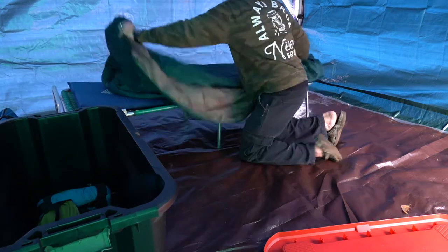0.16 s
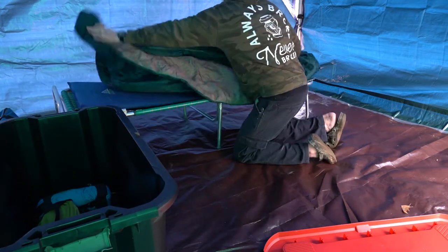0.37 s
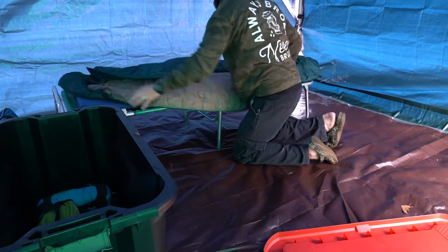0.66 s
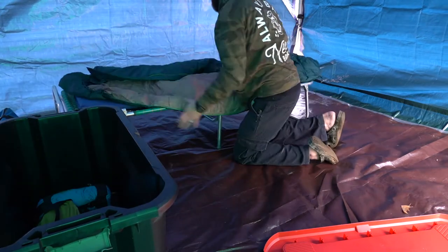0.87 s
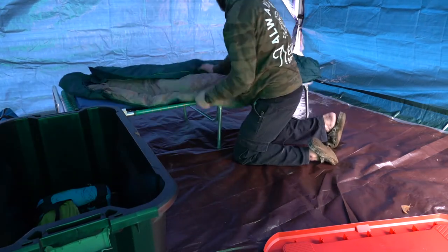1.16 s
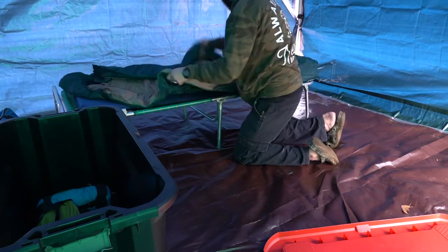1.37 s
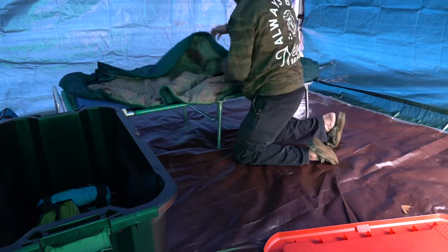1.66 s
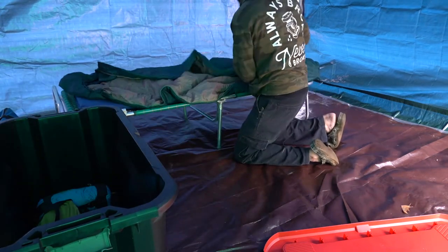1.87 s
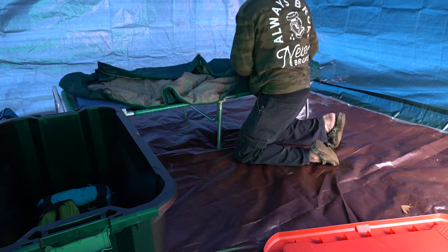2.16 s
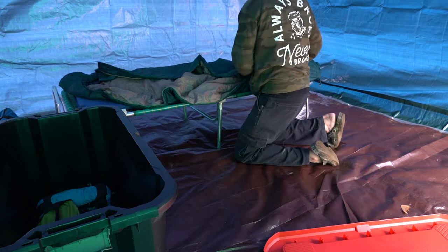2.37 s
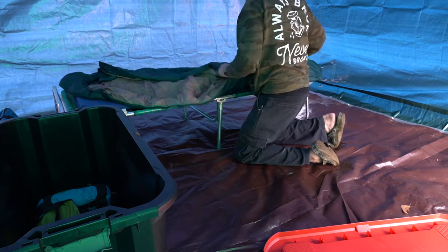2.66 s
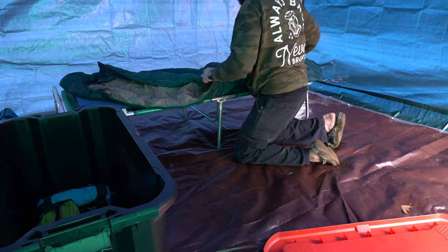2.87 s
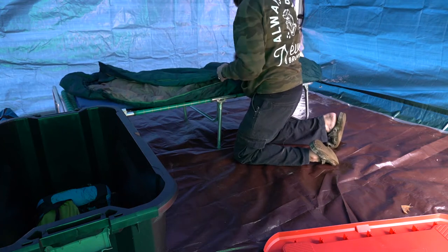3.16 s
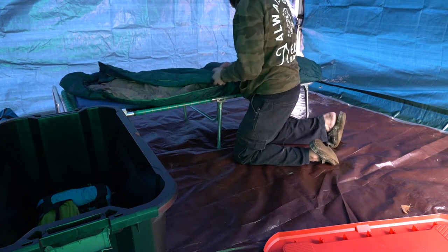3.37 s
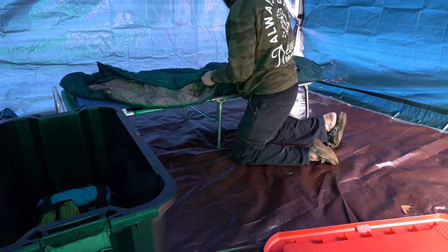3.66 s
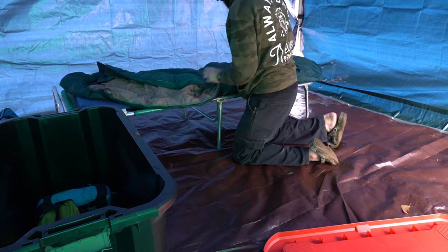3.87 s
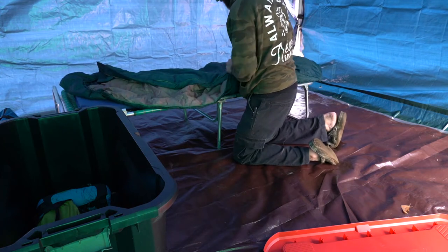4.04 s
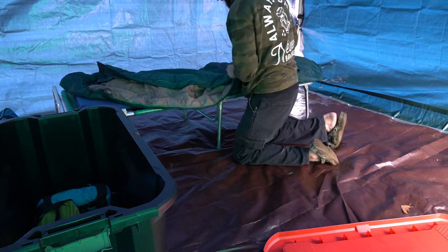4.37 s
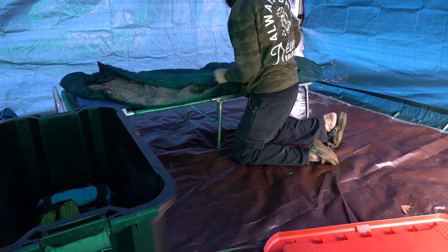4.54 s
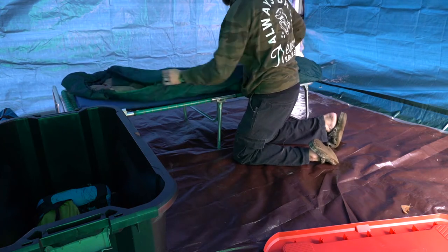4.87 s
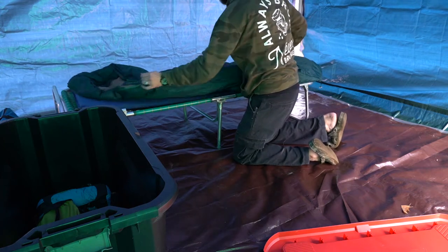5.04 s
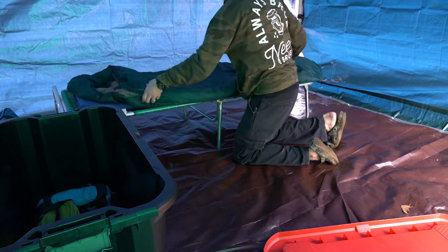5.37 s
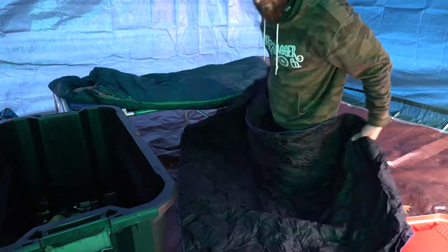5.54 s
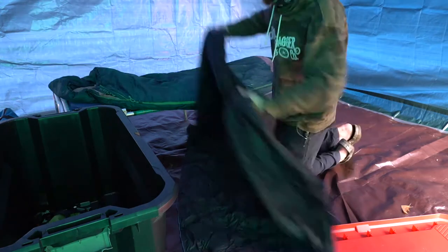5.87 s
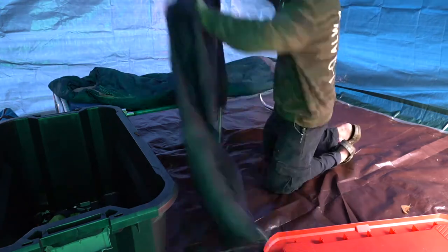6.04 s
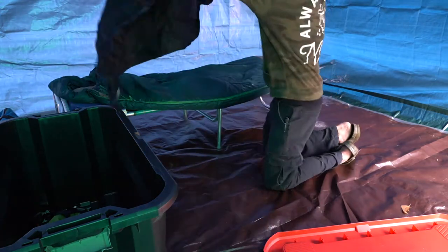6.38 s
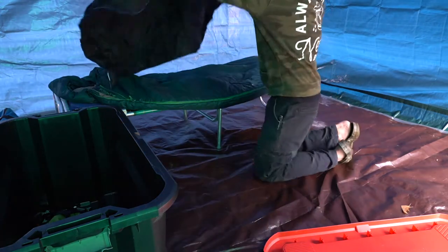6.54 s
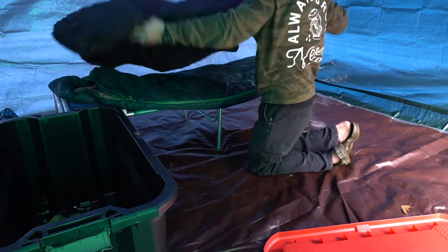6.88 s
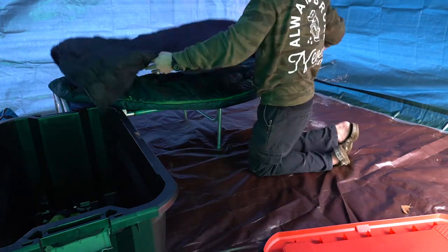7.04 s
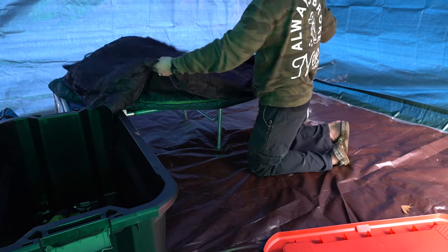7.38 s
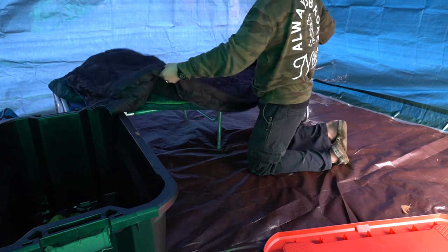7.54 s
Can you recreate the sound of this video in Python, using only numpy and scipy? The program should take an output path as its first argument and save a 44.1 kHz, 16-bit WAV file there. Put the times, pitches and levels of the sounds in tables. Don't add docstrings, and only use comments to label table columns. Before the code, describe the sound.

Close, nearly mono sound with a short dull tent reflection. Slick fabric whooshes, crackles and cracks, with a brief metallic screech and thump early on. Rustling calms, a zipper rasps once, chirps briefly, then after a fabric tug runs longer, rising and slowing. Fresh cloth is then flapped hard, metal clinks once, and softer crinkling settles. Light airy noise stays underneath, with a slow engine faintly chugging outside at first.

```python
import sys
import numpy as np
from scipy import signal
from scipy.fft import rfft, irfft, next_fast_len
from scipy.io import wavfile
from scipy.ndimage import uniform_filter1d, map_coordinates

SR = 44100
rng = np.random.default_rng(int(sys.argv[2]) if len(sys.argv) > 2 else 0)


def convert_level_to_amplitude(level_db):
    exponent = np.asarray(level_db, float) / 20
    return 10 ** exponent


def to_wav(s):
    ch = np.atleast_2d(s).T
    pcm = np.round(np.clip(ch, -1, 1) * 32767)
    wavfile.write(sys.argv[1], SR, pcm.astype(np.int16))


N = 340055
TIME = np.arange(N) / SR

# (frequency [Hz], level [dB])
FLAP = [(20, -22), (45, -4.5), (80, -3), (200, -2.5), (350, -1.5), (500, -10), (900, -51), (1500, -120)]


def unit(x):
    return x / np.sqrt(np.mean(x ** 2) + 1e-20)


def along(points, hz):
    f, v = np.transpose(points)
    return np.interp(np.log(hz + 1), np.log(f + 1), v)


def curves(rows):
    s, *cols = np.transpose(rows)
    return [np.interp(TIME, s, c) for c in cols]


def wobble(rate_hz):
    t = TIME[::8]
    knots = rng.standard_normal(int(N * rate_hz / SR) + 4)
    return np.interp(TIME, t, map_coordinates(knots, [t * rate_hz]))


def filtered(x, response):
    m = next_fast_len(N + SR // 4, True)
    return irfft(rfft(x, m) * response(np.fft.rfftfreq(m, 1 / SR)), m)[:N]


def coloured(x, spectrum):
    return unit(filtered(x, lambda hz: convert_level_to_amplitude(along(spectrum, hz))))


def resonant(x, modes):
    def response(f):
        total = 0
        for k, (centre, width, db) in enumerate(modes):
            band = 1j * f * width
            total = total + (-1) ** k * convert_level_to_amplitude(db) * band / (centre * centre - f * f + band)
        return total
    return filtered(x, response)


def patchy(x, depth_db, size=4):
    z = signal.stft(np.pad(x, (0, 512)), nperseg=256)[2]
    field = uniform_filter1d(rng.standard_normal(z.shape), size, 0)
    field = uniform_filter1d(field, 2 * size, 1)
    return unit(signal.istft(z * convert_level_to_amplitude(depth_db * unit(field)), nperseg=256)[1][:N])


def ring(t, hz, t60):
    return np.sin(2 * np.pi * hz * t) * convert_level_to_amplitude(-60 * t / t60)


def add(track, s, sound):
    start = round(s * SR)
    track[start:][:len(sound)] += sound[:N - start]


def swell(t, s, db, rise, fall):
    return db - 10 * np.maximum((s - t) / np.abs(rise), (t - s) / np.abs(fall))


def effort():
    # (peak time [s], effort [dB], rise [s per 10 dB], fall [s per 10
    # dB], brightness [dB])
    cloth_moves = [(.13, -33.5, 0.1, 0.18, -2), (.24, -25.5, .12, 0.19, -1.5), (.41, -29.5, 0.12, .05, 0.5),
                   (.55, -26.5, 0.03, .06, 3), (.607, -37, .01, .05, 8), (0.629, -26, 0.01, 0.07, 0),
                   (.73, -37, 0.4, 0.65, -1.5), (1.18, -36, 0.03, 0.31, 4), (1.43, -30, 0.13, 0.06, -3),
                   (1.61, -40, -0.2, .05, 3), (1.775, -41, 0.04, 0.1, -1), (2.134, -44.5, .05, 0, -2.5),
                   (2.23, -42, -0.06, 0, 9), (2.83, -35, 0.5, 0.16, -3.5), (2.86, -32.5, 0, .06, 2),
                   (3.04, -38, 0.14, 0.15, -1), (3.28, -44.5, 0.1, 0.2, -4.5), (3.526, -37, 0.07, 0.08, 0),
                   (3.71, -39, 0.16, 0, -9), (3.8, -40, 0.16, 0, 3), (4.016, -45.5, -0.4, .3, 2),
                   (.88, -41.5, 0, .15, -2), (2.287, -43, .02, .03, 8), (1.52, -42.5, 0.5, -1, 4),
                   (4.5, -41.5, 0.18, 0.1, -8.5), (5.11, -39.5, 0.14, 0.04, -12.5), (5.16, -39, .1, 0.2, 2),
                 (5.3, -40, .025, 0.2, 4), (5.38, -35, .06, 0.14, -2.5), (5.45, -33, 0.13, .05, 6),
                 (6.59, -34.5, 0.17, 0.14, 0), (6.71, -35.5, 0.13, 0.1, 1), (7.3, -40, 0.2, 0.14, -4.5),
                 (5.56, -36.5, 0, .3, 2), (5.72, -35.5, 0.06, 0.2, 1.5), (5.9, -31, 0.14, 0.16, -3),
                 (6.0, -27, 0.22, 0.16, 0.5), (6.075, -23.5, 0.084, 0.105, -4), (6.24, -38, .15, 0.26, 8),
                 (6.66, -35, 0.17, 0.18, -1), (6.82, -35.5, .05, .1, 2.5), (6.98, -37.5, 0.3, 0.1, 0.5),
                 (7.11, -37, 0.1, 0.25, -3), (7.436, -38, 0.08, 0.1, 1), (7.644, -36, 0.2, -1, -0.5),
                 (7.71, -35, 0.13, 0.06, 1)]
    # (rest level [dB], usual level [dB], growth with effort [dB/dB], brightness share [dB/dB])
    layers = [
        (-50.5, -44, 0.87, -1.07),
        (-46, -37, 0.96, -0.87),
        (-57, -36, 1.07, 0.059),
        (-70, -42.5, 1.07, 0.35),
    ]
    usual_effort_db = -35
    s, db, rise, fall, bright = np.transpose(cloth_moves)[:, :, None]
    t = TIME[::32]
    moves = swell(t, s, db, rise, fall) - usual_effort_db
    levels = []
    for rest_db, usual_db, grows, share in layers:
        moving = convert_level_to_amplitude(2 * (usual_db + grows * moves + share * bright)).sum(0)
        levels.append(np.interp(TIME, t, 10 * np.log10(convert_level_to_amplitude(2 * rest_db) + moving)))
    return levels


def cloth():
    # (frequency [Hz], level [dB])
    fold_spectrum = [(150, -120), (300, -11.5), (500, -3), (650, 0), (950, -1), (1300, -6), (1700, -14.5),
                     (3500, -120)]
    swish_spectrum = [(600, -120), (1200, -22.5), (1700, -1.5), (2500, -0.5), (3300, -3.5), (4000, -8.5),
                      (5000, -24.5), (8000, -120)]
    fizz_spectrum = [(2000, -120), (3600, -1.5), (4400, 0.5), (5200, -0.5), (6500, -5.5), (9000, -8.5),
                     (12000, -9), (14000, -13), (15700, -18)]
    spectra = (FLAP, fold_spectrum, swish_spectrum, fizz_spectrum)
    levels = effort()
    chance, size, sign = rng.random((3, N))
    clicks = chance < 700 / SR * convert_level_to_amplitude(3 * wobble(25))
    creases = clicks * (size + 1e-2) ** -.25 * np.sign(sign - .5)
    flutter = wobble(30)
    sound = np.zeros(N)
    for level_db, spectrum, crackle in zip(levels, spectra, (0.62, 0.68, 0.42, 0.29)):
        rubbing = patchy(rng.standard_normal(N), depth_db=2.0)
        rub = coloured(rubbing + crackle * unit(creases), spectrum)
        sound += convert_level_to_amplitude(level_db + 0.73 * flutter + 0.47 * wobble(22)) * rub
    return sound


def air():
    # (frequency [Hz], level [dB per Hz])
    air_spectrum = [(15, -31), (25, 10.5), (148, -8), (299, -10.5), (380, -14.5), (618, 8.5), (831, -15),
                    (1030, -2.5), (1350, -15), (2720, -8), (7180, -21), (12000, -24.5), (15700, -28)]
    return convert_level_to_amplitude(-43.5) * coloured(patchy(rng.standard_normal(N), depth_db=2.5), air_spectrum)


def snaps():
    # (time [s], peak level [dB], pitch [Hz], thud level [dB])
    fold_snaps = [(0.099, -20.5, 1030, -6.5), (0.194, -14, 520, -7.5), (0.24, -5, 1630, -27),
                  (0.249, -7.5, 1140, -28), (0.285, -12, 1050, -28), (0.324, -7, 1100, -12),
                  (0.655, -19, 5000, -30), (0.377, -14, 1900, -32), (0.381, -16, 920, -30),
                  (0.15, -17, 754, -20), (0.216, -16, 500, -12), (0.4, -10, 2400, -32),
                  (0.623, -3.5, 2770, -34), (0.636, -19, 2630, -26), (0.654, -18, 900, -19),
                  (0.88, -27.5, 643, -22), (1.108, -19, 668, -17), (1.132, -20.5, 490, -8),
                  (1.181, -18, 4500, -30), (1.415, -8, 2320, -19), (1.762, -19, 570, -14),
                  (1.988, -28, 533, -4), (3.596, -9, 680, -26), (4.256, -8.5, 979, -37),
                  (4.289, -20, 401, -28), (4.309, -17, 446, -35),
                  (5.469, -12.5, 860, -41), (5.708, -14, 723, -11.5), (6.065, -4, 1060, -21),
                    (6.076, -13.5, 925, -24), (6.088, -9.5, 1050, -7.5), (6.101, -14, 565, -5.5),
                    (6.274, -22, 900, -10), (5.888, -17, 700, -20), (6.036, -14, 2400, -30),
                    (6.073, -8, 1500, -20), (6.143, -16, 1900, -25), (6.391, -13, 883, -37),
                    (6.428, -13, 1140, -26), (6.671, -20, 690, -33), (6.789, -22.5, 902, -28),
                    (6.888, -18, 1260, -17), (7.082, -25, 477, -27), (7.116, -20.5, 554, -10),
                    (7.123, -21, 452, -23), (7.198, -20.5, 786, -10), (7.226, -21, 444, -20),
                    (7.278, -21.5, 765, -20.5), (7.514, -16.5, 746, -21), (7.522, -22.5, 930, -14.5),
                    (7.548, -15, 1500, -24), (7.624, -21, 956, -24), (7.669, -25, 770, -21)]
    snap_delay_s = .0012
    sound, t = np.zeros(N), np.arange(SR // 16) / SR
    for s, db, hz, thud_db in fold_snaps:
        noise = rng.standard_normal((2, len(t)))
        fold = 1.24 * (1 - np.exp(-t * hz * 3.2)) * ring(t, hz, 12 / hz)
        fold += .6 * ring(t, 2.1 * hz, 5 / hz)
        puff = 0.65 * convert_level_to_amplitude(-60 * t / 0.015) * uniform_filter1d(np.diff(noise[0], prepend=0), size=12)
        edge_db = -45 - .6 * db
        edge = convert_level_to_amplitude(edge_db) * convert_level_to_amplitude(-60 * t / 0.005) * np.diff(noise[1], prepend=0)
        thud = convert_level_to_amplitude(thud_db + 8) * ring(t, 268, 0.025)
        add(sound, s + snap_delay_s, convert_level_to_amplitude(db - 2.0) * (fold + puff + edge + thud))
    return sound


def landings():
    # (time [s], peak level [dB], pitch [Hz], t60 [s])
    drops = [
        (0.565, -13, 175, 0.045),
        (4.261, -34, 126, 0.21),
    ]
    delay_s = .0012
    sound, t = np.zeros(N), np.arange(SR // 16) / SR
    for s, db, hz, t60 in drops:
        thump = ring(t, hz, t60) + 1.3 * ring(t, 2.1 * hz, 0.6 * t60)
        add(sound, s + delay_s, convert_level_to_amplitude(db + 6) * (1 - np.exp(-t / .0025)) * thump)
    return sound


def tent(x):
    # (frequency [Hz], t60 [s])
    decay = [(200, 0.16), (2000, 0.17), (10000, 0.13)]
    hz, t, z = signal.stft(rng.standard_normal(SR // 4), SR, nperseg=256)
    tail = signal.istft(z * convert_level_to_amplitude(-60 * t / along(decay, hz)[:, None]), SR, nperseg=256)[1]
    return signal.fftconvolve(np.pad(x, (150, 0)), tail / np.linalg.norm(tail))[:N]


def engine():
    # (first knock [s], period [s], last knock [s])
    first_s, period_s, last_s = (.116, .15165, 5.5)
    # (frequency [Hz], width [Hz], level [dB])
    exhaust = [(205, 19, -4), (308.5, 17, -9)]
    blows = np.zeros(N)
    times = np.arange(first_s, last_s, period_s)
    size = convert_level_to_amplitude(1.05 * rng.standard_normal((60, 2)))[:len(times)]
    blows[np.round(times * SR).astype(int)] = size[:, 0]
    blows[np.round((times + .05) * SR).astype(int)] = 0.31 * size[:, 1]
    knock = resonant(resonant(blows, exhaust), [(240, 270, 0)])
    running = np.clip((last_s - TIME) / .05, 0, 1)
    rumble = running * coloured(rng.standard_normal(N), FLAP)
    return convert_level_to_amplitude(-29) * knock / np.abs(knock).max() + convert_level_to_amplitude(-46) * rumble


def squeal():
    # (time [s], rib rate [1/s], level [dB])
    strum = [
        (.47, 1200, -36),
        (.476, 1300, -17),
        (.486, 1800, -15),
        (.503, 2000, -15),
        (.53, 1950, -19),
        (.558, 1800, -30),
    ]
    during = slice(round(strum[0][0] * SR), round(strum[-1][0] * SR))
    rate, level_db = (c[during] for c in curves(strum))
    k = np.arange(2, 8)[:, None]
    ribs = np.cumsum(rate * (1 + .04 * wobble(600)[during])) / SR
    rough = uniform_filter1d(rng.standard_normal((len(k), len(rate))), size=40, axis=1)
    overtones = convert_level_to_amplitude(-4 * k) * (.5 + 5 * rough) * np.sin(2 * np.pi * k * ribs)
    sound = np.zeros(N)
    sound[during] = convert_level_to_amplitude(level_db) * overtones.sum(0)
    return sound


def skids():
    # (time [s], peak level [dB], low tone [Hz], high tone [Hz])
    scrapes = [
        (0.4725, -5.5, 1260, 2550),
        (0.4833, -1, 1870, 3380),
        (0.4926, -14, 1720, 4150),
        (0.5004, -2.5, 1855, 3920),
        (0.509, -5, 1950, 3950),
        (0.52, -7.5, 1900, 3900),
        (0.5318, -12, 1900, 3760),
        (0.545, -18, 910, 4000),
    ]
    sound, t = np.zeros(N), np.arange(SR // 8) / SR
    for s, db, low_hz, high_hz in scrapes:
        envelope = convert_level_to_amplitude(-60 * t / 0.036) * (1 - np.exp(-t / 0.003))
        shake = uniform_filter1d(envelope * rng.standard_normal(len(t)), size=3)

        def mode(hz, q):
            return signal.lfilter(*signal.iirpeak(hz, q, SR), shake)

        tones = 1.43 * mode(low_hz, 17) + 1.5 * mode(high_hz, 22)
        fixed_tone = 0.38 * mode(3300, 12)
        over = 0.08 * (mode(1.5 * high_hz, 12) + mode(2 * high_hz, 12))
        add(sound, s, convert_level_to_amplitude(db + 12.5) * (tones + fixed_tone + over + 0.04 * shake))
    return sound


def groans():
    # (time [s], level [dB], pitch [Hz])
    answers = [
        (.473, -13, 1270),
        (.518, -16.5, 600),
        (.542, -14.5, 1040),
        (6.315, -20, 600),
    ]
    sound, t = np.zeros(N), np.arange(SR // 8) / SR
    for s, db, hz in answers:
        add(sound, s, convert_level_to_amplitude(db) * (1 - np.exp(-t / 0.0032)) * ring(t, hz, 0.062))
    return sound


def zipper():
    # (start time [s], end time [s])
    travels = [
        (2.37, 2.825),
        (3.595, 3.73),
        (4.4, 5.17),
    ]
    # (time [s], tooth rate [1/s], force [dB], tape hum over force [dB])
    first_pull = [
        (2.37, 270, -33, -18),
        (2.385, 310, -30, -18),
        (2.395, 345, -28.5, -18),
        (2.458, 540, -26.5, -6),
        (2.49, 770, -26, -10),
        (2.53, 960, -21.5, -10),
        (2.55, 920, -22.5, -8),
        (2.61, 900, -20.5, 1),
        (2.662, 930, -21, -9),
    ]
    restart = [
        (2.667, 650, -23, 5),
        (2.684, 560, -25, 14),
        (2.71, 655.6, -21, 3),
        (2.72, 808, -25, -9),
        (2.776, 900.3, -19, -12),
        (2.82, 860, -30, -14),
    ]
    short_pull = [
        (3.595, 790, -31, -11),
        (3.607, 870, -21, -8),
        (3.618, 940, -21, -6),
        (3.627, 1090, -21, 1),
        (3.639, 1240, -19.5, -3),
        (3.66, 1220, -19.5, -1),
        (3.674, 990, -23, 1),
        (3.698, 640, -26, -2),
        (3.73, 282.5, -37.5, -10),
    ]
    last_pull = [
        (4.4, 138, -37.5, 9),
        (4.49, 380, -29.5, 3),
        (4.5, 492, -24.5, 7),
        (4.515, 630, -27, 15),
        (4.551, 795.6, -22, -18),
        (4.595, 880, -19.5, -4),
        (4.645, 800, -20, -3),
        (4.69, 825, -21, 3),
                 (4.766, 858, -19, -1),
        (4.803, 870, -19.5, 0),
        (4.83, 945, -20, -3),
        (4.88, 1020, -20.5, 5),
        (4.95, 1020, -22, 5),
        (5.04, 787.5, -23.5, 0.5),
        (5.06, 569.6, -27.5, -6),
        (5.125, 300, -31, 7),
        (5.17, 170, -57, -2),
    ]
    # (frequency [Hz], width [Hz], level [dB])
    slider_modes = [(600, 250, -1), (1820, 970, -3), (2650, 940, 1), (3440, 900, -0.5), (4460, 1230, -9.5)]
    # (frequency [Hz], level [dB])
    coil = [(2500, -120), (4500, -7), (5500, -1), (8000, -5), (11000, -5), (13000, -3.5), (15700, -9.5)]
    # (frequency [Hz], level [dB])
    tape = [(500, -6), (750, 3), (1100, 0), (1300, -4), (1700, 2), (2000, -13), (2400, 4.5)]
    # (time [s], overtone [-], level [dB], length [s])
    catches = [(2.53, 4, -29, .012), (2.555, 4, -26, .012), (2.55, 2, -27, .03), (2.565, 3, -29, .02),
               (2.6, 2, -25, .02), (2.606, 5, -28, .008), (2.616, 4, -26, .014), (2.635, 2, -27, .015),
               (2.652, 3, -27, .014), (2.663, 2, -26, .012), (2.666, 5, -29, .008), (2.735, 2, -25, .015),
               (2.765, 2, -30, .018), (2.77, 3, -29, .02), (2.79, 4, -29, .01), (2.796, 3, -28, .01),
               (3.611, 2, -28, .005), (3.614, 3, -24, .009), (3.64, 2, -22, .009), (3.641, 3, -23, .006),
               (3.66, 3, -26, .006), (4.555, 5, -31, .02), (4.592, 2, -21, .016), (4.623, 4, -28, .012),
               (4.65, 3, -29, .02), (4.715, 4, -29, .02), (4.725, 3, -28, .025), (4.772, 4, -22, .022),
               (4.803, 5, -28, .014), (4.825, 4, -28, .016), (4.84, 3, -25, .01), (4.87, 3, -29, .015),
               (4.925, 3, -26, .02), (4.96, 3, -28, .015), (5.003, 3, -25, .014), (5.025, 4, -30, .015),
               (4.66, 2, -28, .04), (4.74, 2, -28, .04), (4.68, 4, -31, .04), (4.86, 2, -29, .03),
               (4.96, 2, -28, .02), (4.9, 4, -34, .04), (2.56, 5, -33, .03), (2.49, 2, -28, .012),
               (2.45, 2, -29, .015), (4.8, 1, -21, .012), (4.85, 1, -21, .016), (4.91, 1, -21, .018),
               (4.986, 1, -19, .014), (3.663, 1, -23, .007)]
    slow_share, fast_share = (.013, .019)

    rate, rasp_db, tape_db = curves(first_pull + restart + short_pull + last_pull)
    hum_db = rasp_db + tape_db
    octave_db = rasp_db - 7.5 - .38 * tape_db + along(tape, 2 * rate)
    slowing = np.clip(-np.gradient(np.log(rate)) * SR, 0, 8)
    octave_db -= 2.5 * slowing
    hiss_db = .63 * rasp_db - 24.5 + 3 * np.log2(rate / 800)
    on = sum(np.clip(np.minimum(TIME - start, end - TIME) / .005, 0, 1) for start, end in travels)
    teeth = np.cumsum(rate * (1 + slow_share * wobble(60) + fast_share * wobble(300))) / SR

    hum = convert_level_to_amplitude(hum_db + .5 + 3 * wobble(90)) * np.sin(2 * np.pi * teeth)
    hum += convert_level_to_amplitude(octave_db - 5 + 4.5 * wobble(100)) * np.sin(4 * np.pi * teeth)
    flicker = convert_level_to_amplitude(3 * wobble(150))
    for s, k, db, length in catches:
        near = slice(round((s - .1) * SR), round((s + .1) * SR))
        bump = np.exp(-((TIME[near] - s) / length) ** 2) * flicker[near]
        hum[near] += convert_level_to_amplitude(db + 4.5) * bump * np.sin(2 * np.pi * round(k) * teeth[near])

    knock = np.exp(30 * (np.cos(2 * np.pi * teeth) - 1))
    grit = knock ** .1 * rng.standard_normal(N)
    rocking = patchy((knock - .07) * convert_level_to_amplitude(1.5 * wobble(500)), depth_db=5, size=4)
    pushes = .62 * rocking + .95 * unit(grit)
    force = np.abs(uniform_filter1d(resonant(pushes, slider_modes[1:]) ** 2, SR // 12))
    rasp = resonant(pushes, slider_modes) / np.sqrt(force + 1e-9)
    hiss = coloured(grit + 0.77 * rng.standard_normal(N), coil)
    rasp = convert_level_to_amplitude(rasp_db - 3 + 0.46 * wobble(60)) * rasp
    hiss = convert_level_to_amplitude(hiss_db + 1.2 * wobble(40)) * hiss
    return on * (hum + rasp + hiss)


def tug():
    # (peak time [s], level [dB], rise [s per 10 dB], fall [s per 10 dB])
    tug_move = (4.29, -18.5, 0.055, 0.11)
    # (frequency [Hz], level [dB per Hz])
    drag = [(60, -38), (120, -6.5), (200, -26), (350, -0.5), (700, -6.5), (1000, -10), (1600, -15.5),
            (2700, -13), (4500, -10), (5500, -15.5), (7500, -25.5), (10000, -30.5), (12000, -25),
            (15700, -39)]
    rub = coloured(patchy(rng.standard_normal(N), depth_db=1.5), drag)
    return convert_level_to_amplitude(swell(TIME, *tug_move) + 0.96 * wobble(90)) * rub


def clink():
    # (hit time [s], damped time [s])
    start_s, end_s = (6.3145, 6.393)
    # (frequency [Hz], level [dB], t60 [s])
    frame_modes = [(1900, -4, 0.031), (2350, -2.5, 0.041), (3030, -4.5, 0.093), (3724, -3, .07),
                   (4285, -4, 0.35), (4433, 0, 0.3), (4900, -5, 0.05), (5840, -17, .08)]
    # (frequency [Hz], level [dB])
    jangle = [(300, -120), (1200, -28), (2200, -3), (3200, 1), (4500, 7.5), (5600, -1.5), (9000, -9.5),
              (12000, -9), (15700, -13)]
    sound, t = np.zeros(N), np.arange(SR // 8) / SR
    damped = np.clip((end_s - start_s - t) / .006, 0, 1)
    modes = sum(convert_level_to_amplitude(db) * ring(t, hz, t60) for hz, db, t60 in frame_modes)
    rattle = coloured(rng.standard_normal(N), jangle)[:len(t)]
    rattle *= convert_level_to_amplitude(-60 * t / 0.3) + 1.4 * convert_level_to_amplitude(-60 * t / 0.028)
    add(sound, start_s, convert_level_to_amplitude(-16.5) * damped * (.95 * modes + 0.72 * rattle))
    return sound


def scene():
    near = snaps() + landings() + squeal() + skids() + groans() + zipper() + clink()
    mono = near + convert_level_to_amplitude(-7) * tent(near) + cloth() + tug() + engine() + air()
    return np.array([mono, mono])


def top_cut(x):
    return signal.sosfilt(signal.butter(12, 16440, fs=SR, output="sos"), x)


def record(dry):
    # (frequency [Hz], level [dB])
    trace_spectrum = [(2500, -70), (4500, -14), (8000, 0), (13000, -6)]
    top_hz = 15800
    kept = filtered(dry[0], lambda hz: hz < top_hz)
    trace = convert_level_to_amplitude(-13) * filtered(kept, lambda hz: convert_level_to_amplitude(along(trace_spectrum, hz)))
    trace *= wobble(900) * convert_level_to_amplitude(8 * wobble(25) - 9)
    return top_cut(np.array([kept + trace, kept - trace]))


dry = scene()
out = record(dry)
to_wav(out)
```